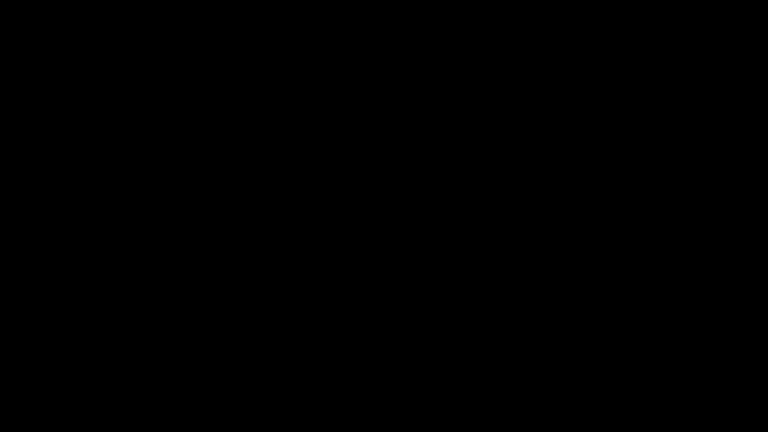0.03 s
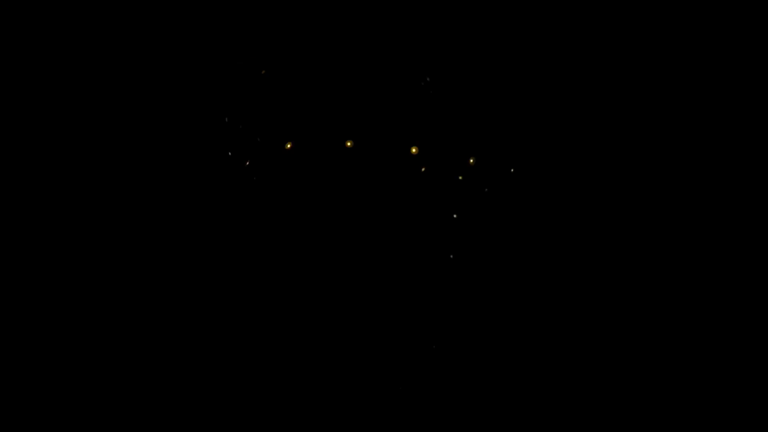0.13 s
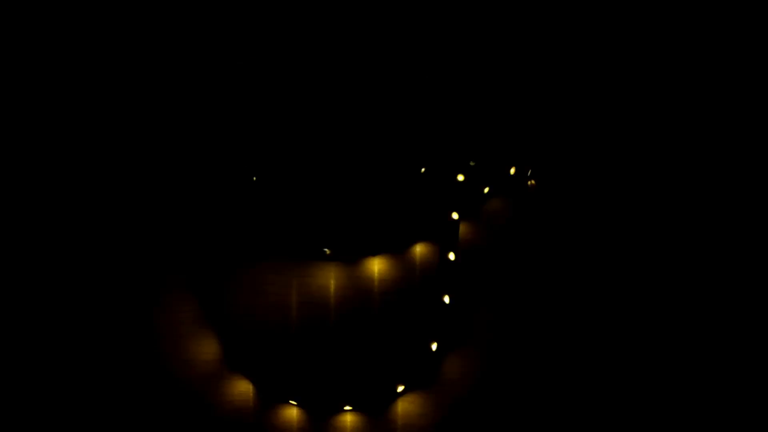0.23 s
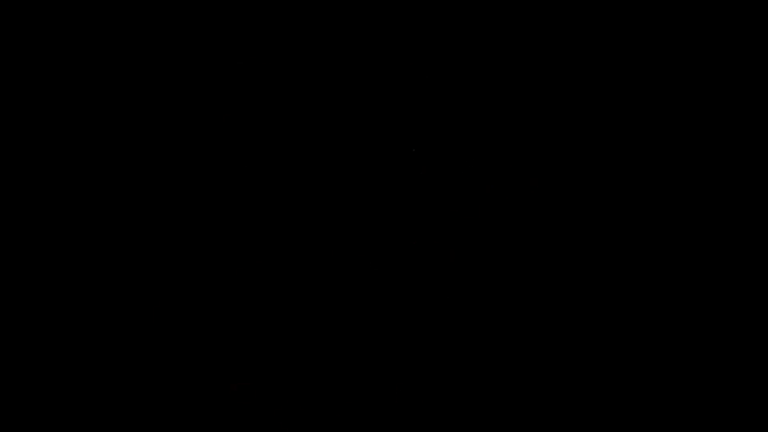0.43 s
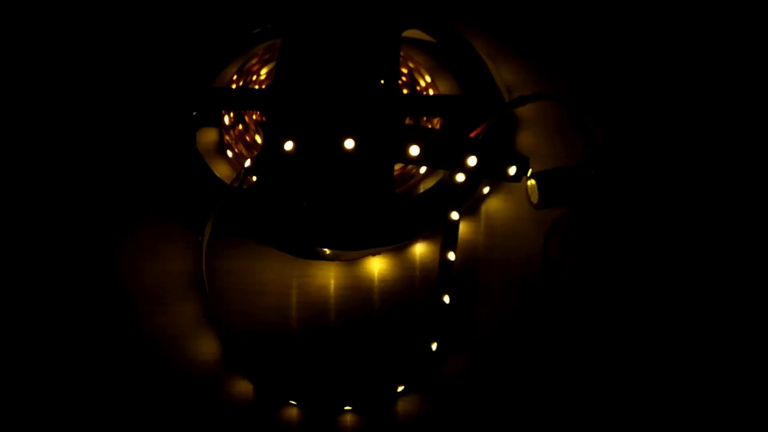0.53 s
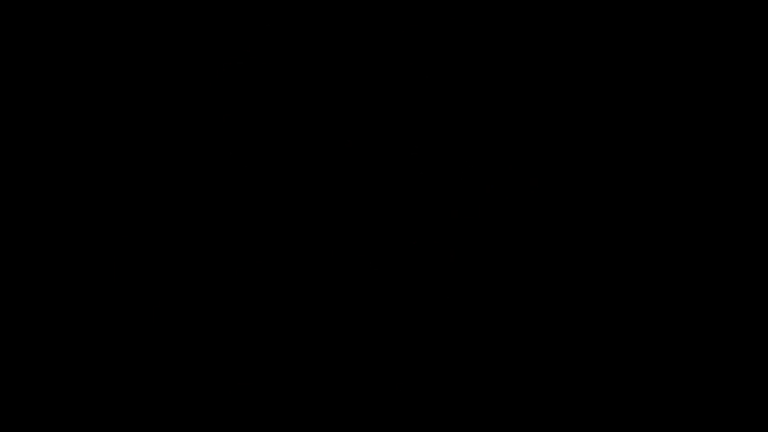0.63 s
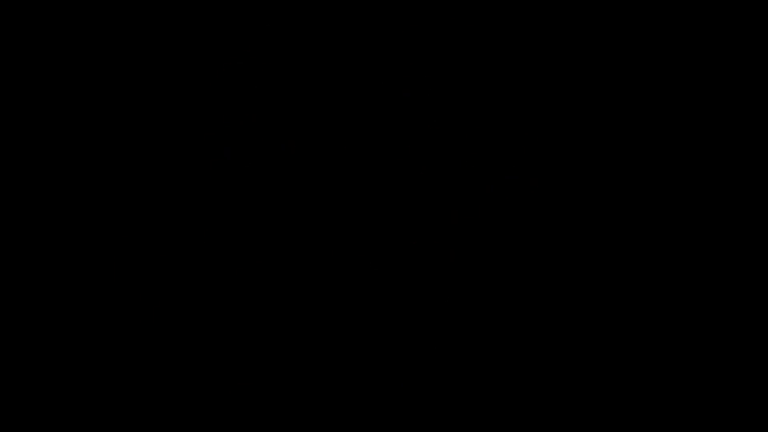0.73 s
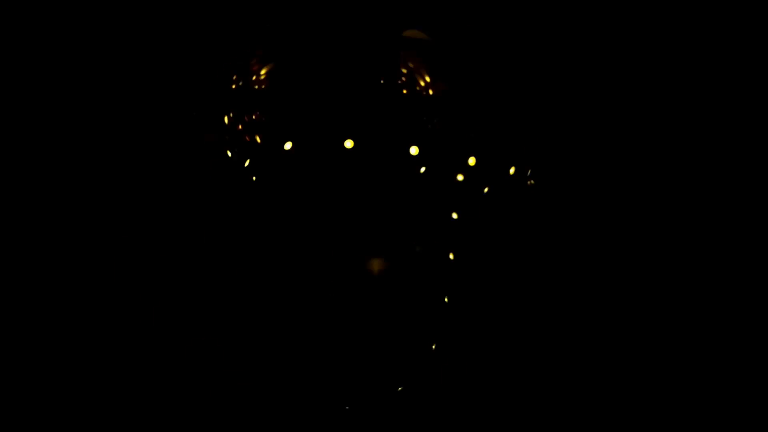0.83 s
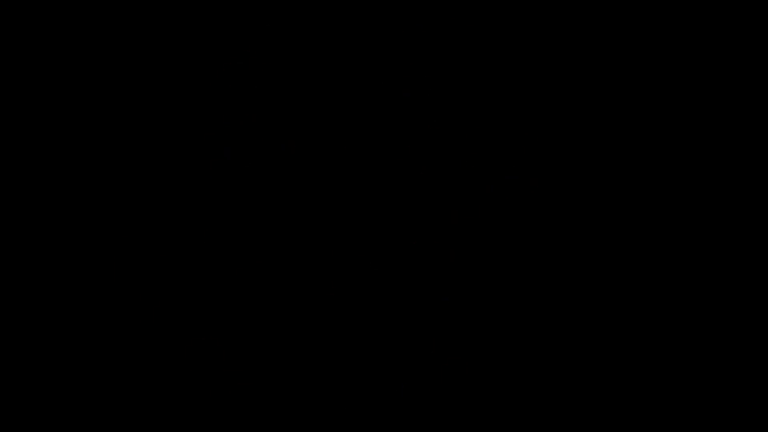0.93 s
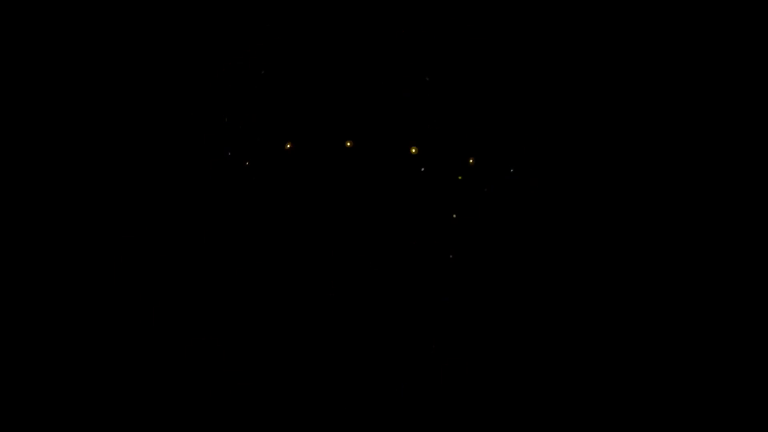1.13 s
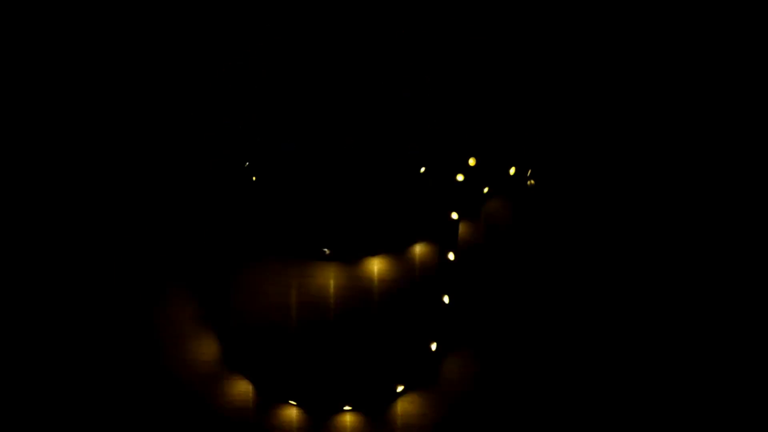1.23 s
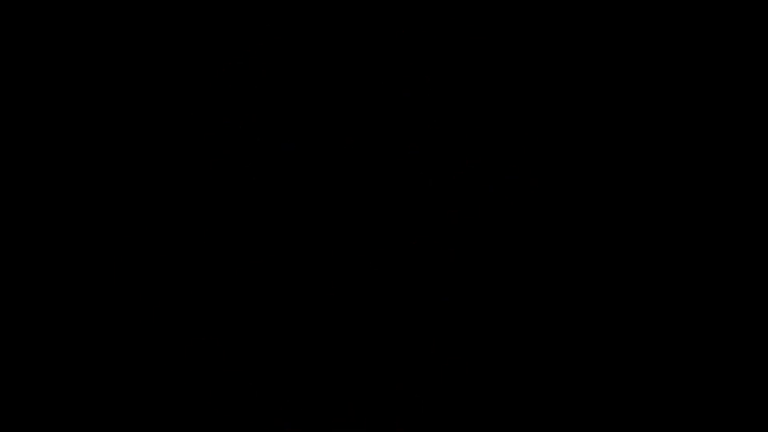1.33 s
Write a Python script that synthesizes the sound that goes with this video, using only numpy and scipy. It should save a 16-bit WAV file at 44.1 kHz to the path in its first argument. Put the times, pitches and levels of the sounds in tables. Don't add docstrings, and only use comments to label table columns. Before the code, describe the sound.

Rapid, even relay clicks, crisp and bright, in a hard-walled room, with a single hollow board knock

```python
import sys
import numpy as np
from scipy import signal
from scipy.fft import rfft, irfft, next_fast_len
from scipy.io import wavfile
from scipy.ndimage import uniform_filter1d

SR = 44100
rng = np.random.default_rng(int(sys.argv[2]) if len(sys.argv) > 2 else 0)


def boost_factor(decibels):
    exponent = np.asarray(decibels, float) / 20
    return 10 ** exponent


def waveform_to_disk(signal):
    frames = np.transpose(np.atleast_2d(signal))
    scaled = np.clip(frames, -1, 1) * 32767
    samples = np.round(scaled).astype(np.int16)
    wavfile.write(sys.argv[1], SR, samples)


N = 61739

# columns t/s, peak level/dB, shelf level/dB
RELAY_STROKES = [
    (0.1531, -26.5, -29),
    (0.2952, -30.5, -31),
    (0.4374, -30.5, -29),
    (0.5794, -30, -29),
    (0.7243, -29, -32),
    (0.8664, -28.5, -28),
    (1.0083, -29, -29.5),
    (1.1501, -28.5, -28),
    (1.2946, -30.5, -29),
]
# columns t/s, peak level/dB, shelf level/dB
STROKE_BEFORE = [
    (0.01, -26, -31),
]
# columns delay t/s, contact level/dB, spring level/dB
ARMATURE_BOUNCES = [(.00078, 0, -9), (.00102, 7, -3), (.0021, -8, -14), (.0031, -12, -7), (.0042, -7, -5),
                    (.0053, -11, -7), (.0060, -9, -4), (.0068, -12, -3), (.0078, -13, -4), (.0086, -13, -4),
                    (.0096, -14, -11), (.0140, -13, -14)]


def relay():
    s, db, shelf_db = np.transpose(STROKE_BEFORE + RELAY_STROKES)
    lag, loss_db, spring_db = np.transpose(ARMATURE_BOUNCES)
    jitter = rng.uniform(.97, 1.03, (len(s), len(lag)))
    when = (s[:, None] + lag * jitter).ravel()
    touch_db = (db[:, None] + loss_db).ravel()
    chatter_db = (db[:, None] + spring_db).ravel()
    clicks = contact(when, touch_db) + spring(when, chatter_db)
    return clicks, shelf(s, shelf_db, when, touch_db)


STROKE_SPREAD_DB = 1.2

# columns f/Hz, level/dB, t60/s
CONTACT_MODES = [(7440, -14, .004), (8350, 4, .0028), (10100, 1.5, .003), (12100, -10, .005),
                 (13100, -8, .005)]


def contact(when, touch_db):
    tones = strike(when, touch_db - 7.0, CONTACT_MODES, STROKE_SPREAD_DB, flips=False)
    return tones + bursts(when, touch_db - 19, 0.0015, 4700, 14000)


# columns f/Hz, level/dB, t60/s
SPRING_MODES = [(5300, -13, .005), (6190, -8, .008), (6800, -13, .006)]


def spring(when, chatter_db):
    return strike(when, chatter_db - 2.5, SPRING_MODES, STROKE_SPREAD_DB, flips=False)


# columns f/Hz, level/dB, t60/s
SHELF_MODES = [(440, -9, 0.05), (729, -16, 0.035), (907, -18, 0.035), (1179, -13, 0.038), (1700, -23, .02)]
# columns f/Hz, level/dB, t60/s
TAP_MODES = [(690, -1, .075), (635, -4, .05), (900, -5, .05), (1330, -8, .04)]


def shelf(s, shelf_db, when, touch_db):
    tones = strike(s + 0.002, shelf_db, SHELF_MODES, 2, flips=True)[0]
    thuds = bursts(when, touch_db - 21, 0.0018, 330, 2150)[0]
    taps = strike(np.array([.8585, .8760]), np.array([-44, -44]), TAP_MODES, 1.0)[0]
    return tones + thuds + taps


# columns t/s, ring level/dB, crack level/dB
KNOCK_TOUCHES = [
    (0.303, -44.5, -41),
    (0.307, -64, -34.5),
    (0.3114, -31.5, -32),
    (0.3128, -20.5, -25),
    (0.315, -33, -25.5),
    (0.3197, -31.5, -26),
    (0.3243, -40, -35.5),
    (0.348, -45, -42),
]
# columns f/Hz, level/dB, t60/s
BOARD_MODES = [(205, -11, .1), (350, -12, .07), (533, -12, .08), (590, -2, .07), (1200, -10, .08),
               (1380, -12, .05), (1620, -12, .05), (2160, -10, .05), (1045, -9, .09), (845, -13, .09),
               (926, -3, .11), (985, -12, .1), (1080, -4, .24), (1126, -16, .08)]
# columns t/s, level/dB, f/Hz
BOARD_SWELLS = [(0.3245, -17, 930), (0.348, -21, 992), (.3600, -29.5, 960), (.373, -33, 1210),
                (.385, -31, 1045), (.394, -43, 910), (.405, -36, 1050), (.420, -38, 990),
                (.428, -35.5, 1100), (.440, -36, 1204), (.456, -34, 1050), (.460, -32, 992),
                (.484, -39.5, 1008)]


def knock():
    s, db, crack_db = np.transpose(KNOCK_TOUCHES)
    crack = bursts(s, crack_db + 3, 0.0036, 970, 4630)
    body = bursts(s, crack_db + 3.5, 0.0058, 250, 1290)
    board = strike(s, db, BOARD_MODES, 1.0, flips=False)[0]
    swell_octaves = .2
    for when, swell_db, near_hz in BOARD_SWELLS:
        near = []
        for hz, level_db, t60 in BOARD_MODES:
            away = np.log2(hz / near_hz) / swell_octaves
            near.append((hz, level_db - 20 * away ** 2, t60))
        board = board + strike(np.array([when]), swell_db, near, 0.83, flips=False)[0]
    return board, (crack + body) * [[1], [.7]]


def tick():
    return bursts(np.array([.512]), -41, .005, 3800, 7200)


def rustle():
    return bursts(np.array([0.058]), -27.5, 0.16, 320, 600)


# columns f/Hz, t60/s
ROOM_DECAY = [(200, 0.38), (1000, 0.59), (4000, 0.69), (9000, 0.33), (14000, 0.13)]
# columns f/Hz, level/dB
ROOM_COLOUR = [(200, 6), (1000, -2.5), (4000, -5), (9000, 5), (14000, 10.5)]


def room(x):
    t = np.arange(SR) / SR
    edges = 100 * 2 ** np.arange(0, 7.6, .5)
    tail = 0
    for low, high in zip(edges, np.append(edges[1:], 19000)):
        centre = np.sqrt(low * high)
        band = band_pass(rng.standard_normal((2, SR)), low, high)
        tail = tail + band * boost_factor(at_hz(ROOM_COLOUR, centre) - 60 * t / at_hz(ROOM_DECAY, centre))
    gap_s = 0.005
    tail = tail * np.clip(t / gap_s - 1, 0, 1)
    return signal.fftconvolve(x, rms_one(tail) / np.sqrt(SR), axes=1)[:, :N]


# columns f/Hz, level per Hz/dB
AIR_SPECTRUM = [(30, -15), (70, -3.5), (120, 3.5), (450, -5), (1200, -10.5), (2500, -12.5), (5000, -19),
                (14000, -20)]
# columns f/Hz, width/Hz, level/dB
HUM_LINES = [(117.76, 4.9, -56.5), (139, 12, -66), (209.3, 10.4, -60.5), (397, 68, -65)]


def air():
    hz = np.fft.rfftfreq(N, 1 / SR)
    broad = rms_one(irfft(rfft(rng.standard_normal((2, N))) * boost_factor(at_hz(AIR_SPECTRUM, hz)), N))
    slow = uniform_filter1d(rng.standard_normal(N), size=1500)
    slow = rms_one(uniform_filter1d(slow, size=1500))
    out = boost_factor(-51 + .8 * slow) * broad
    for centre_hz, width_hz, db in HUM_LINES:
        resonance = 1 + ((hz - centre_hz) / width_hz * 2) ** 2
        out += boost_factor(db) * rms_one(irfft(rfft(rng.standard_normal((2, N))) / resonance, N))
    return out


def rms_one(x):
    return x / np.sqrt(np.mean(x ** 2) + 1e-20)


def at_hz(points, hz):
    table_hz, value = np.array(points).T
    return np.interp(np.log(hz + 1), np.log(table_hz), value)


def band_pass(x, low_hz, high_hz):
    return signal.sosfilt(signal.butter(2, [low_hz, high_hz], "band", fs=SR, output="sos"), x)


def ring(clicks, hz, t60):
    r = boost_factor(-60 / (t60 * SR))
    w = 2 * np.pi * hz / SR
    return signal.lfilter([.5, 0, -.5], [1, -2 * r * np.cos(w), r * r], clicks + 1e-18)


def strike(s, db, modes, spread_db, flips=True):
    out = np.zeros((2, N))
    for hz, level_db, t60 in modes:
        clicks = np.zeros((2, N))
        sign = rng.choice([-1, 1], (2, 1)) if flips else 1
        uneven_db = spread_db * rng.standard_normal((len(s), 2)).T
        clicks[:, (s * SR).astype(int)] = boost_factor(db + level_db + uneven_db) * sign
        out += ring(clicks, hz, t60)
    return out


def bursts(s, db, decay_s, low_hz, high_hz):
    gate = np.zeros(N)
    gate[(s * SR).astype(int)] = boost_factor(db)
    gate = signal.lfilter([1], [1, -np.exp(-1 / (decay_s * SR))], gate + 1e-18)
    return band_pass(gate * rng.standard_normal((2, N)), low_hz, high_hz)


LEFT_ONLY = [
    [1],
    [0],
]


def scene():
    (clicks, shelf_sound), (board, crack) = relay(), knock()
    near = clicks + crack + (shelf_sound + board + tick()) * LEFT_ONLY
    tail = room(boost_factor(-6.5) * (clicks + shelf_sound) + boost_factor(-1.5) * crack + boost_factor(-11.5) * board)
    return near + tail + air() + rustle()


def roll_off(x):
    return signal.sosfilt(signal.butter(12, 15450, fs=SR, output="sos"), x)


# columns f/Hz, power share
LEFT_SHARE = [(600, 0.46), (3500, 0.74), (5000, 0.95), (8800, 1), (9500, 0.05), (14000, 0.38)]
# columns f/Hz, level/dB
RIGHT_RESPONSE = [(60, 1.5), (250, -2), (1200, 0), (5200, 0), (8500, 0), (10000, 5), (14000, 5)]
# columns f/Hz, correlation
PORT_LIKENESS = [(30, 0), (130, .6), (290, .55), (640, .9), (1100, .995), (5000, .995), (7000, .9),
                 (9500, .72)]


def record(dry):
    size = next_fast_len(N + 64)
    hz = np.fft.rfftfreq(size, 1 / SR)
    a, b = rfft(dry, size)
    late = np.exp(-2j * np.pi * hz * .000426)
    share = np.clip(at_hz(LEFT_SHARE, hz), 0, 1)
    p, q = np.sqrt(share), np.sqrt(1 - share)
    left = p * a + q * b * late
    bass = 1 / (1 + (hz / 517) ** 8)
    alike = np.clip(at_hz(PORT_LIKENESS, hz), 0, 1)
    same = bass * left - (1 - bass) * (p * a * late + q * b)
    other = q * a - p * b * late
    right = alike * same + np.sqrt(1 - alike ** 2) * other
    pair = np.array([left, right * boost_factor(at_hz(RIGHT_RESPONSE, hz))])

    cutoff_hz, past_cut_db, gate_db = 14250, -6, -46
    low = irfft(pair * (hz < cutoff_hz), size)[:, :N]
    top = irfft(pair * (hz >= cutoff_hz), size)[:, :N]
    power = uniform_filter1d(top ** 2, size=200)
    gate = (power / (power + boost_factor(2 * gate_db))) ** 2
    x = low + boost_factor(past_cut_db) * top * gate

    limit, start_s, rise_s = .2, .0825, 0.00068
    opening = np.clip((np.arange(N) / SR - start_s) / rise_s, 0, 1)
    return roll_off(limit * np.tanh(x / limit) * opening)


dry = scene()
out = record(dry)
waveform_to_disk(out)
```